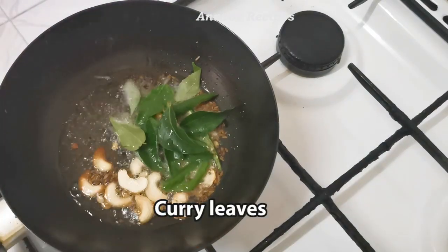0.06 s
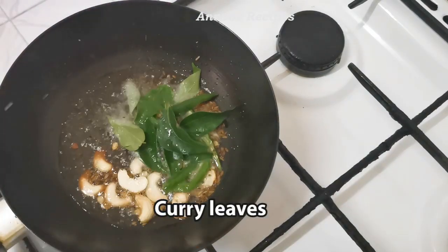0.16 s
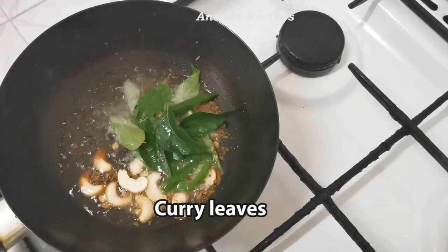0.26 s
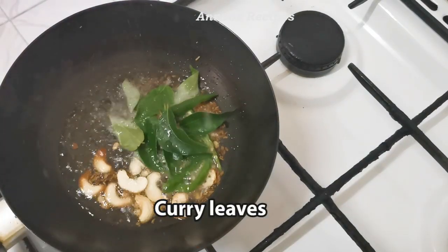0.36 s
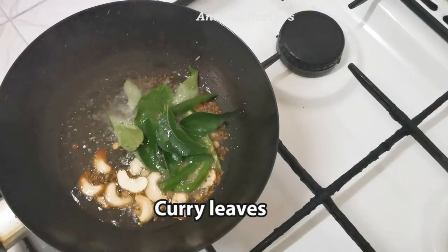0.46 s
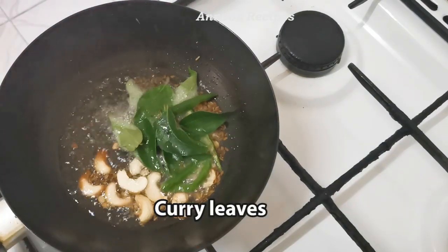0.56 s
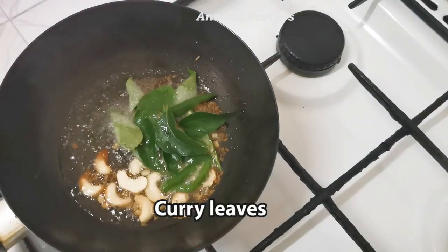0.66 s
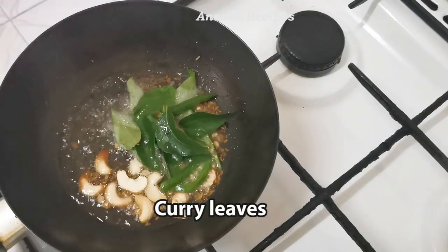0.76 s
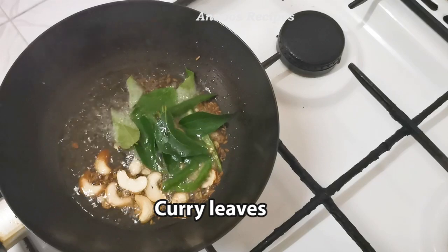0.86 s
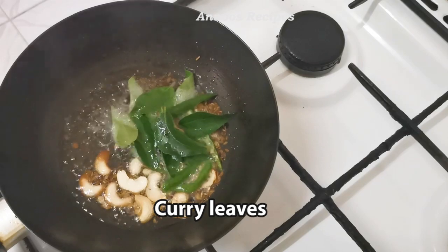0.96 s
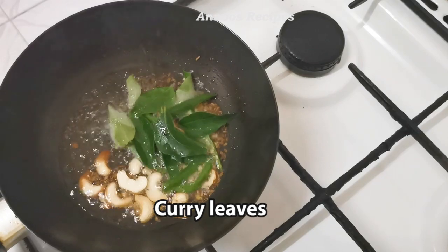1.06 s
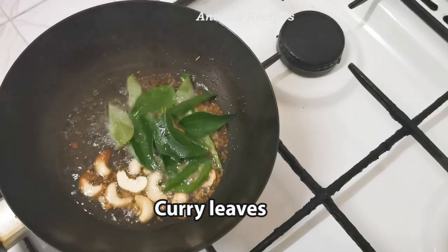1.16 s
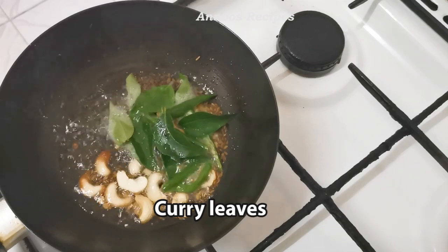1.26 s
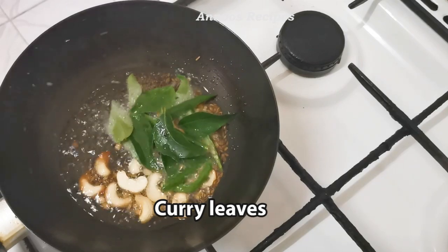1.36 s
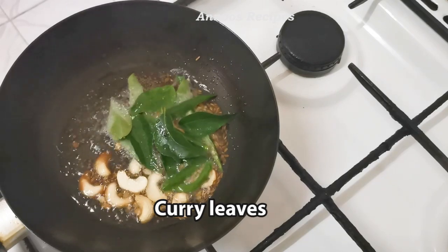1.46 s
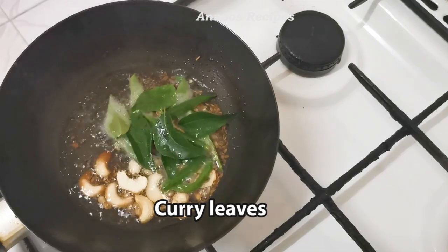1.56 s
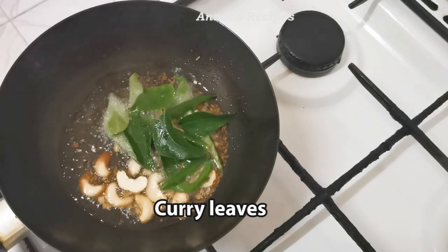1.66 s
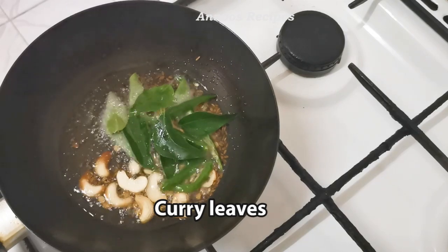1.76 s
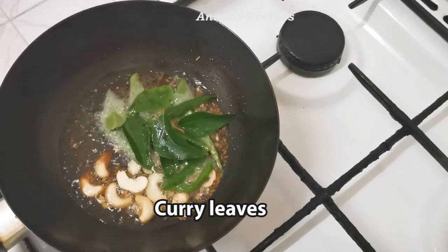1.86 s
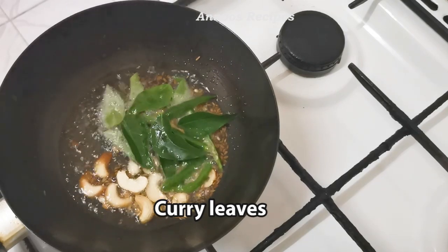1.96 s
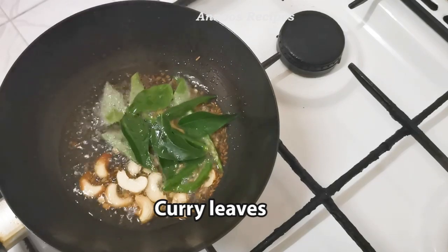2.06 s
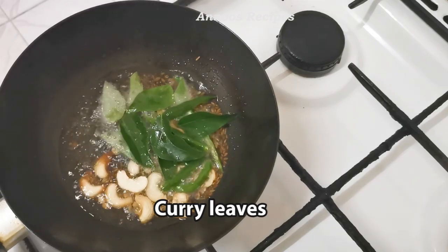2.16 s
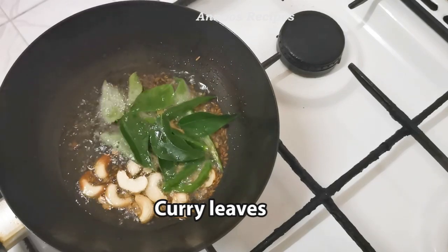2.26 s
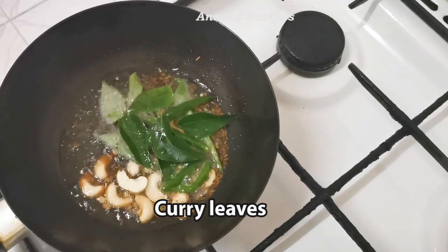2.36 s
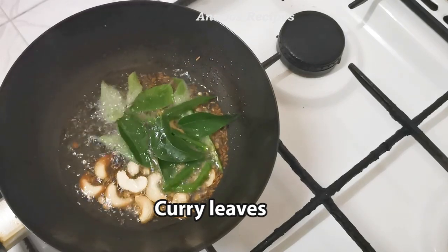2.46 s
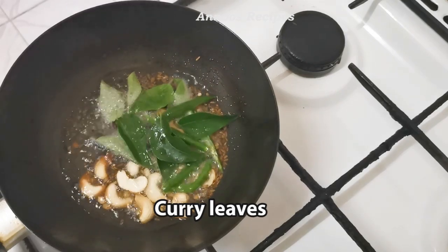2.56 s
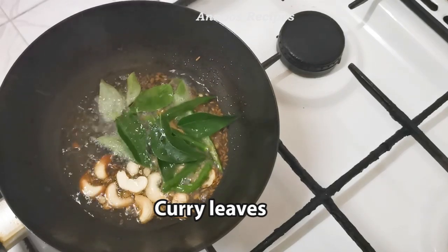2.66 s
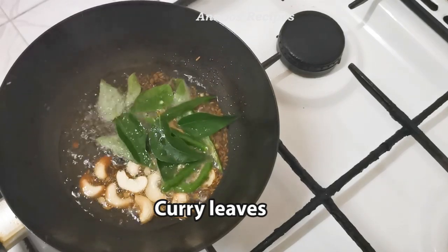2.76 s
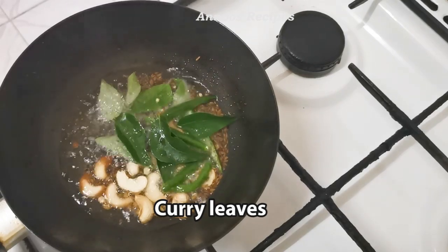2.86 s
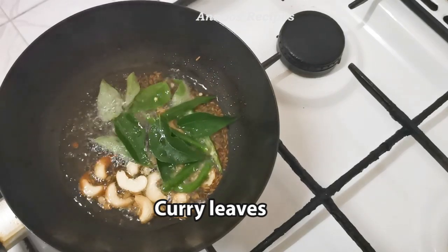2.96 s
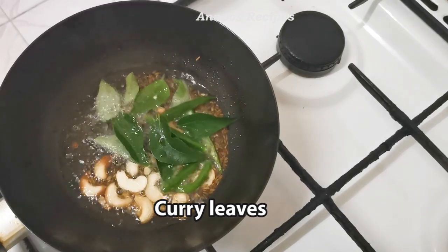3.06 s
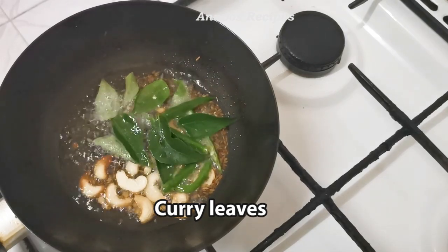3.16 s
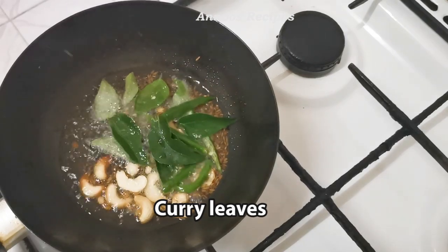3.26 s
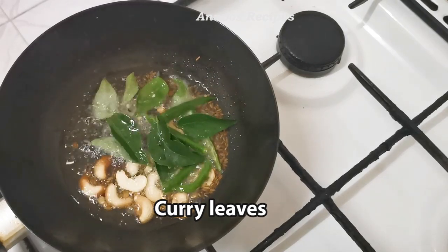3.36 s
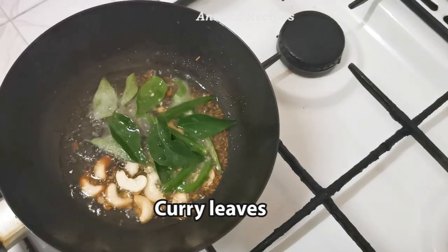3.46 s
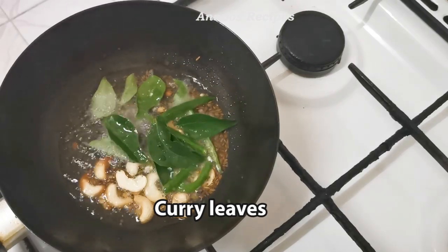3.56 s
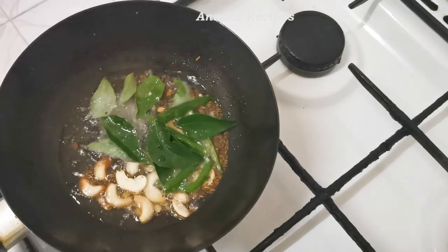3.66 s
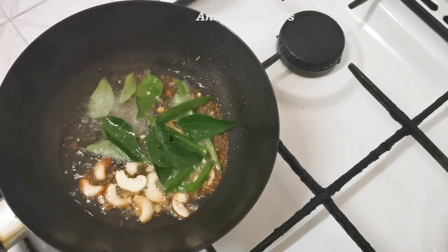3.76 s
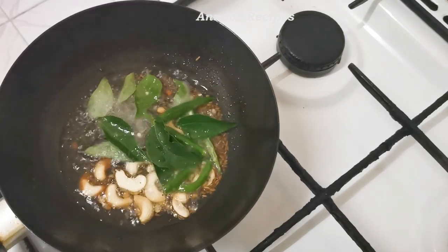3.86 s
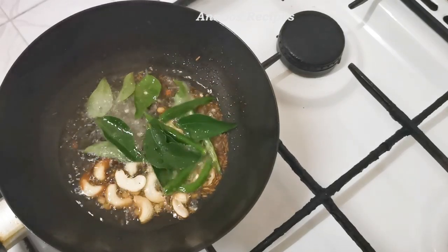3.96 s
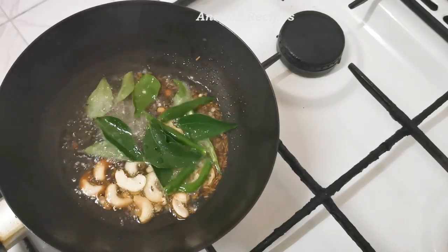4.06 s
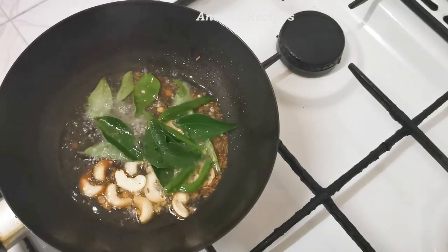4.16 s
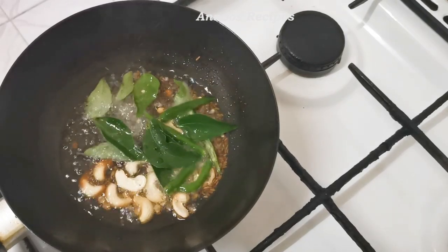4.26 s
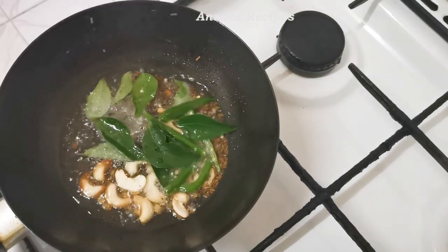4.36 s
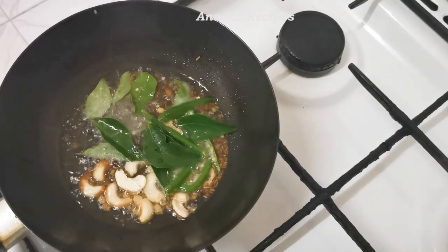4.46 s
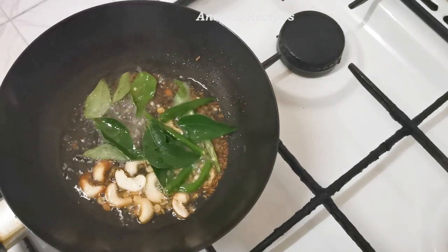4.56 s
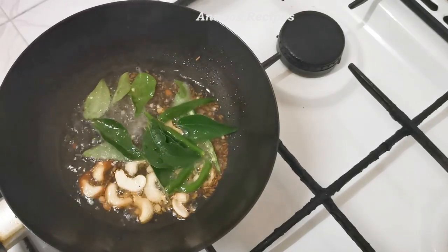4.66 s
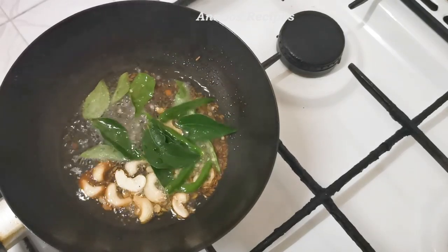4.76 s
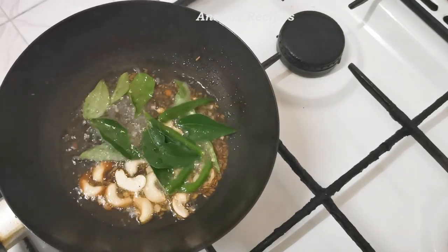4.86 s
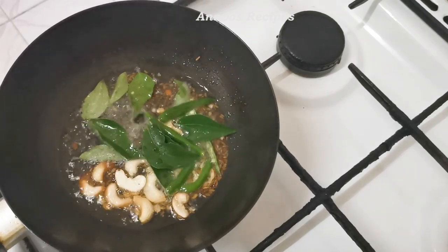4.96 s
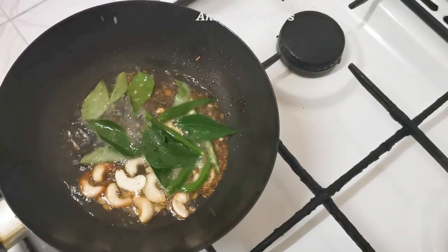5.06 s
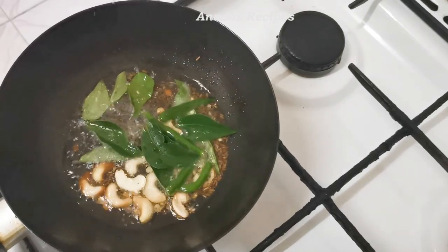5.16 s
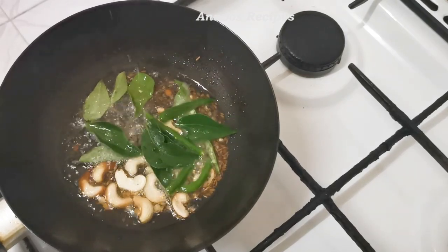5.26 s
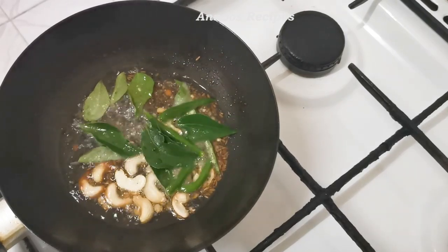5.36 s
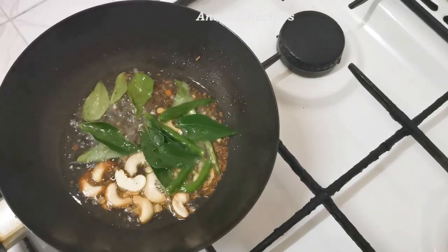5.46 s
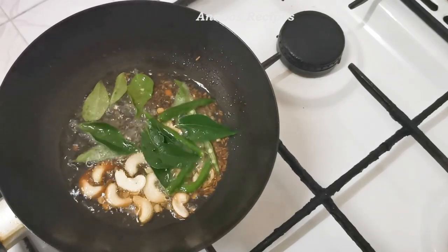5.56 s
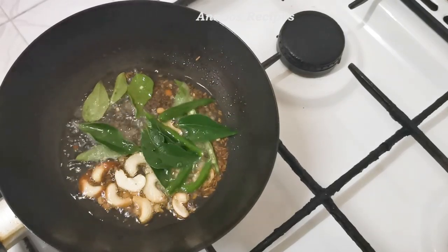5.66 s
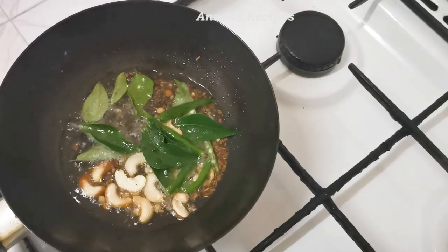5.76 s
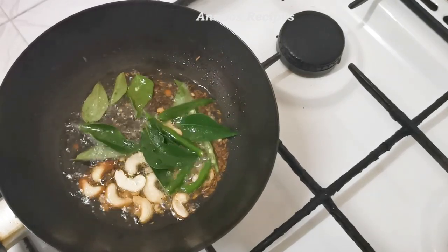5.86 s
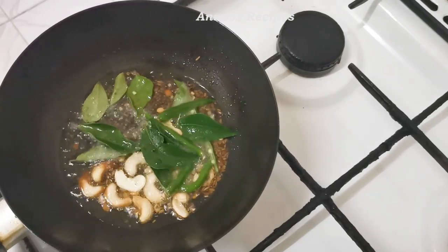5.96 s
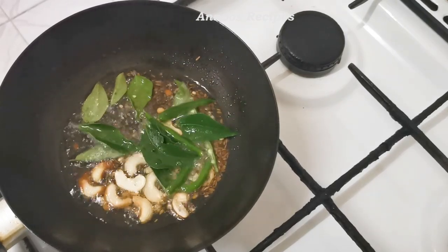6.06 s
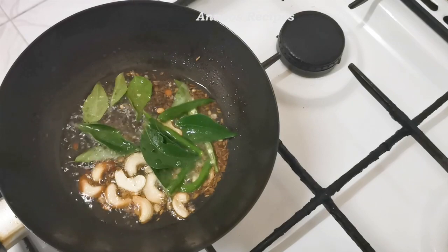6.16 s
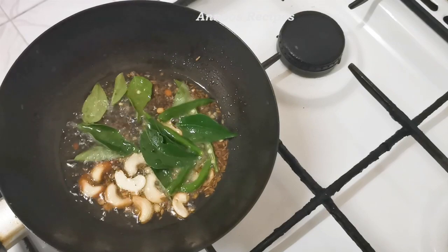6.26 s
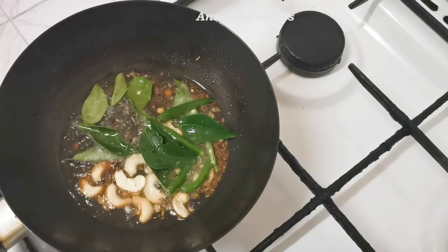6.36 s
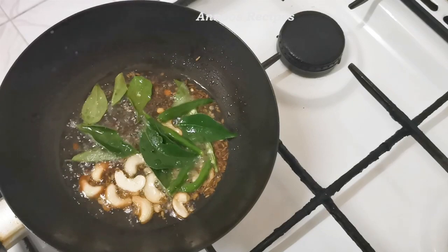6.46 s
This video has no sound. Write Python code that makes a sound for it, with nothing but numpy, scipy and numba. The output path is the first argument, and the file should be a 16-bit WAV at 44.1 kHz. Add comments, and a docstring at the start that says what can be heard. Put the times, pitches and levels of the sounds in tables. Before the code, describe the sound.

Wet leaves and cashew nuts fry in hot oil in a small wok on a kitchen stove, picked up very close in stereo. From 0 s there is a dense rush of steam hiss, slightly fuller on the left, with quick crackles; it falls off within about a second into fine, bright sizzling made of countless tiny bubbles. Irregular sharp snaps and short hollow pops run throughout. Around 2.2 s a loud crack comes with a droplet thumping the microphones, mostly right; another hard snap follows at 2.9 s. Sizzling surges briefly near 3.2 s with more cracks. At 4.1 s a droplet bumps the left side, and at about 4.5 s a strong hollow pop knocks out. After 4.6 s the frying grows thinner and quieter, yet pops and snaps continue to 6.5 s, with crisp ones near 6.1 s. A very faint wavering hum and low burner rumble lie beneath.

```python
"""Wet leaves and nuts fry in hot oil in a small wok, close under a phone with two unlike microphones.
At once a rush of steam hiss dies away over thousands of bursting bubbles a second, rung as fading sines.
A faint low tone swells and fades over the kitchen's filtered-noise rumble. Soon hollow pops and sharp
cracks ring out, then droplets push the microphones; gain control dips after loud peaks. Over the
seconds the hiss thins slowly, and the lower bubble crowd leans to its smaller, higher bubbles."""
import sys
import numpy as np
from scipy import signal
from scipy.fft import rfft, irfft
from scipy.io import wavfile
from scipy.ndimage import uniform_filter1d
from numba import njit

SR = 44100
rng = np.random.default_rng(int(sys.argv[2]) if len(sys.argv) > 2 else 0)


def persist_wave(psi):
    """Save psi, clipped to +-1, as 16-bit WAV."""
    counts = np.round(np.clip(psi, -1, 1) * 32767).astype(np.int16)
    wavfile.write(sys.argv[1], SR, np.atleast_2d(counts).T)


def volts(x):
    """Linear amplitude factor 10**(x/20) for a level x in dB, scalar or array-like."""
    e = np.asarray(x, float) / 20
    return 10 ** e


N = 288017
TIME = np.arange(N) / SR

# bubble crowds before the path to the microphones, relative levels:
# t/s, large level/dB, middling level/dB, small level/dB, extra left level/dB
BOIL_LEVELS = [(0.0, -37, -35.5, -37, 3.5), (0.3, -41, -38, -38, 4), (0.58, -43, -39.5, -40, 2.5),
               (0.82, -43, -40, -42, -0.5), (1.16, -39.5, -42.5, -39, 0.5), (1.45, -42.5, -38, -41, -0.5),
               (1.84, -39, -38.5, -40, -0.5), (2.2, -44, -42.5, -43.5, -0.5), (2.69, -41, -40, -41.5, 0),
               (2.89, -39.5, -43, -40, 0), (2.92, -45.5, -40, -45, 0), (3.16, -37.5, -36, -40.5, 0.7),
               (3.21, -43.5, -39, -43, 1), (3.32, -42, -39.5, -41, 0.3), (3.68, -40.5, -39, -38.5, 1.5),
               (3.71, -46.5, -40, -45.5, 0.5), (3.8, -44, -36, -41.5, 0), (4.31, -47, -43, -42, -0.5),
               (4.48, -46, -39.5, -44, 0.5), (4.6, -47.5, -48, -46, -1.5), (4.89, -45, -45, -41, -0.5),
               (5.28, -49.5, -49, -45.5, -1.5), (5.33, -49.5, -51, -46, -1), (5.62, -45.5, -46, -44.5, -1),
               (5.89, -49, -46, -45.5, -1.5), (6.53, -44.5, -45, -47, -0.8)]
# low hum: t/s, rms level/dB
HUM_LEVELS = [(0.15, -77), (0.33, -62.5), (0.5, -74), (0.8, -103), (1.2, -84), (1.5, -79), (1.65, -68.5),
              (1.88, -75), (2, -64), (2.15, -71.5), (2.95, -89), (3.12, -62.5), (3.22, -77), (3.5, -78),
              (3.62, -63), (4.0, -72), (4.6, -91), (5.2, -80), (5.32, -71), (5.72, -69.5), (5.82, -100),
              (6.42, -79), (6.52, -59)]
# relative spectral density of the kitchen rumble: f/Hz, level/dB
KITCHEN_SPECTRUM = [(12, -34), (20, -5), (54, -0.5), (93, -3.5), (134, 0.5), (380, -10), (603, -11),
                    (700, -5.5), (910, -56), (1540, -120)]
# hollow pops of the largest bubbles, nominal peaks:
# t/s, ring f/Hz, fade to 1/e in cycles, peak level/dB, extra left level/dB
POP_RINGS = [(0.0607, 1760, 0.15, -22.5, 3.5), (0.1101, 3110, 0.24, -29, 2),
             (0.1775, 1390, 0.26, -24.5, -1), (0.1825, 2010, 0.23, -28, 3), (0.2552, 1540, 0.44, -24, 1),
             (0.353, 1250, 0.27, -23, 1), (0.4324, 1410, 0.18, -21, 1.5), (0.4511, 2350, 2.6, -27.5, 3),
             (0.481, 2810, 1.7, -25.5, 2), (0.5136, 1910, 0.16, -23.5, 4), (0.6096, 1720, 0.43, -28, 0),
             (0.9562, 2400, 1.2, -25, 4.5), (1.0621, 3350, 2.6, -27, 3), (1.3334, 2660, 1.9, -25.5, 3),
             (1.4704, 3460, 1.2, -20.5, -2), (1.5891, 2400, 0.91, -30, -3), (1.6786, 2900, 0.36, -21.5, 2),
             (1.7996, 2900, 0.38, -24, 1), (1.8051, 3100, 2.76, -25, 3), (1.8892, 2390, 1.6, -26, 1.5),
             (1.9745, 2500, 0.22, -25, 1), (2.1601, 2080, 0.19, -25, 0), (2.2937, 2350, 0.11, -21.5, 0),
             (2.3824, 1580, 0.86, -21.5, -0.5), (2.4715, 1920, 0.21, -28.5, 2),
             (2.4777, 1770, 0.17, -29, 1), (2.5004, 1350, 0.31, -23.5, -1), (2.593, 2330, 3, -21.5, -1),
             (2.6412, 2760, 2.21, -35, -1), (2.769, 1850, 0.25, -24, 1), (2.8473, 2060, 0.61, -23, -1),
             (2.8758, 1270, 0.5, -26.5, 1), (3.0118, 2520, 0.51, -29, 0), (3.1376, 2020, 0.83, -20, 1),
             (3.1843, 2070, 0.2, -26, 4), (3.285, 1490, 0.51, -21.5, -0.5), (3.2938, 1860, 0.18, -28, 0),
             (3.3213, 1420, 0.33, -25.5, 0), (3.5659, 1710, 0.7, -26.0, 0), (3.6552, 1830, 0.95, -24.5, 1),
             (3.7483, 2600, 1.1, -28, -2), (3.9412, 1390, 0.26, -22, -0.5), (4.0738, 2890, 0.69, -25, 0),
             (4.0834, 2500, 1.9, -27.5, 3.5), (4.1255, 1920, 0.97, -20.5, 0.5),
             (4.2249, 2570, 4.5, -30.5, 0), (4.2639, 2160, 3.3, -28, -2), (4.3804, 2780, 0.63, -28, -1),
             (4.479, 2350, 0.21, -22, -4), (4.4848, 1510, 0.17, -13.5, -0.5), (4.5466, 3290, 1.9, -31, 0),
             (4.5905, 2920, 0.29, -25, 2), (4.7051, 2030, 3.0, -29, -2), (4.7098, 2880, 1.5, -32, 0),
             (4.776, 1420, 0.56, -24.5, -1), (4.8066, 1470, 0.44, -25.5, 0), (4.8295, 1410, 0.25, -19.5, 1),
             (5.0492, 2860, 1.3, -33, 0), (5.0831, 2270, 0.98, -26, -2), (5.1758, 2760, 1.2, -34, -1),
             (5.2006, 2010, 0.18, -32, 1), (5.2155, 3400, 1.5, -28.0, -1), (5.281, 2530, 1.9, -24, 0),
             (5.5055, 2580, 2.2, -22, 0), (5.5969, 1780, 0.16, -34, 1), (5.6103, 1940, 0.37, -26, 1),
             (5.7383, 2980, 0.29, -25.5, 0), (5.9002, 2200, 0.21, -28.5, -2), (5.909, 2290, 0.25, -28.5, 0),
             (5.9651, 1490, 0.29, -32, -2), (5.9704, 1950, 0.58, -26.5, 0), (6.0714, 2760, 0.13, -27, 3),
             (6.1765, 2790, 0.25, -27, 2), (6.2469, 2250, 0.31, -24.5, 0), (6.2521, 1890, 0.88, -28, 0),
             (6.4956, 1960, 0.96, -24.5, -1.5)]
# sharp cracks as a film of oil tears, nominal peaks:
# t/s, ring f/Hz, fade to 1/e in cycles, peak level/dB, extra left level/dB
CRACK_RINGS = [(0.0608, 6180, 0.65, -22, 8), (0.1105, 6910, 0.35, -20, -5), (0.1826, 7100, 0.77, -17.5, 3),
               (0.2345, 6980, 1.15, -17.5, 6), (0.2941, 7700, 0.66, -18.5, 4), (0.4688, 7250, 1.41, -17, 3),
               (0.4786, 7290, 0.66, -22, -1), (0.4925, 6770, 1.57, -19.5, 5), (0.5137, 6440, 1.98, -29, 3),
               (0.5279, 8600, 0.66, -18, 7), (0.5717, 5730, 0.4, -17, 3), (0.7291, 6990, 0.66, -19, 5),
               (0.8278, 8970, 0.53, -23.5, 1), (0.8364, 7300, 0.7, -22, 3), (1.1448, 5100, 3.7, -22.5, 3),
               (1.17, 7360, 1.8, -28, -4), (1.1742, 6610, 0.72, -18, 2), (1.1928, 9090, 2.4, -26, -3),
               (1.277, 9040, 1.11, -22, 7), (1.3085, 8400, 1.1, -19, 0), (1.3736, 7100, 1.1, -24, -2),
               (1.4101, 7720, 0.79, -18, -31), (1.5224, 6000, 0.43, -16.5, -3),
               (1.5608, 8670, 1.42, -33, -9), (1.5672, 5800, 1.1, -14.5, -2), (1.7452, 7400, 2.4, -20, -7),
               (1.9782, 6950, 1.0, -21, -3), (2.0394, 7750, 1.25, -21, -9), (2.0623, 7660, 1, -19, -4),
               (2.1658, 7280, 0.72, -19, -10), (2.1767, 8000, 0.87, -11, 3), (2.2932, 8060, 0.3, -19, -1),
               (2.3793, 5870, 1.9, -24, -2), (2.4716, 7510, 2.56, -20, -2), (2.4779, 8100, 0.8, -25, -23),
               (2.5005, 7180, 0.34, -16.5, -6), (2.6055, 8340, 0.82, -25, -5), (2.7818, 5900, 2.2, -23, -2),
               (2.8483, 6200, 1.5, -24, -2), (2.8913, 7130, 1.06, -21, -5), (2.9044, 7900, 0.57, -13.5, -3),
               (3.0483, 8140, 1, -20, -11), (3.1464, 6960, 2.64, -26, -7), (3.1771, 6770, 0.7, -23, 2),
               (3.1845, 7900, 0.5, -13.5, -1), (3.294, 8730, 0.65, -18.5, 1),
               (3.3466, 5240, 0.71, -17.5, 1), (3.4334, 7100, 1.1, -22, -2), (3.512, 6440, 2.1, -22, 2),
               (3.5941, 6900, 1.1, -28, -2), (3.61, 6140, 3.1, -20, 4), (3.6869, 7790, 1.35, -21, 3),
               (3.8502, 6730, 1.53, -29, 2), (3.8651, 7500, 1.2, -20, -1), (3.9413, 5900, 0.8, -29, 0),
               (3.9472, 6100, 0.97, -18.5, -1), (4.085, 6900, 1.1, -23, -2), (4.0896, 6790, 0.51, -22, -3),
               (4.0999, 6670, 0.29, -18, 8.5), (4.2214, 6200, 0.78, -29, -3),
               (4.2308, 8200, 1.3, -19.5, -10), (4.3588, 6900, 1.1, -21.5, -2),
               (4.4669, 7300, 3.0, -28.0, -3), (4.4849, 4560, 2.1, -23.5, -3), (4.547, 6400, 0.6, -28, 0),
               (4.5906, 9050, 2, -19, -4), (4.754, 6680, 0.57, -24, 6), (4.7761, 6800, 0.7, -23, 0),
               (4.8067, 7770, 1.04, -25, -2), (4.8298, 10140, 1.2, -23.5, -5),
               (4.9724, 7140, 0.85, -20, -5), (5.0351, 7300, 0.9, -26, -6), (5.059, 7600, 1.1, -24, -6),
               (5.088, 7900, 1.1, -25, -5), (5.1272, 6900, 1.1, -28, -2), (5.154, 7100, 0.9, -26, -3),
               (5.2008, 9250, 3.0, -24, -1), (5.2157, 8550, 0.26, -23.5, 1), (5.2326, 7760, 2.68, -31, -8),
               (5.3054, 6180, 0.55, -19.5, 4), (5.3621, 6900, 0.9, -27, -2), (5.3913, 6800, 1.2, -26, -4),
               (5.4583, 8560, 1.3, -22.5, -3), (5.5245, 7340, 0.9, -26.5, -2), (5.6174, 9030, 3.0, -30, 0),
               (5.64, 8460, 0.51, -25, -7), (5.6529, 6830, 0.7, -30, -4), (5.7636, 8240, 0.86, -22.5, -9),
               (5.8042, 8840, 0.77, -27, -6), (5.8331, 7540, 2.2, -23.5, -11), (5.8956, 8200, 0.71, -21, 4),
               (6.0487, 7780, 2.7, -28, -9), (6.0716, 6600, 0.83, -16.5, -2), (6.1179, 7600, 0.58, -27, -7),
               (6.1767, 7850, 1, -16.5, -8), (6.2995, 7250, 2.8, -26.5, -9), (6.3163, 6810, 0.71, -26, -1),
               (6.335, 9350, 0.78, -22.5, -6), (6.3834, 6960, 1.1, -27, -2), (6.495, 6900, 0.63, -23, -3)]
# droplets on the microphones: t/s, left push level/dB, right push level/dB
DROPLET_PUSHES = [(0.34, -40, -60), (0.375, -38, -48), (0.527, -70, -38), (0.627, -42, -45),
                  (1.411, -70, -44), (2.063, -68, -43), (2.177, -29.5, -14), (2.9048, -63.5, -31.5),
                  (4.0998, -24.5, -51), (4.515, -33, -46), (4.5909, -52, -35), (6.177, -69.5, -37.5)]
# response of wok bowl and microphone ports together: f/Hz, left level/dB, right level/dB
PORT_RESPONSE = [(262, -24.5, -20), (540, -13, -17.5), (629, -20, -26), (659, -9, -13), (713, -17, -15),
                 (840, -6.5, -7), (984, -5, -3), (1330, -8, -10), (1590, -1, -2), (1770, -3, -1),
                 (1950, 1, 1), (2363, -7, -3), (2600, -0.5, 1), (2900, 0, 4.5), (3100, 0, 0.5),
                 (3080, 0, 1), (4300, -12, -2.5), (5450, -4.5, 3), (5800, 0, 5.5), (6070, -14, 2.5),
                 (6290, -9, 2), (7745, -14.5, 9), (8180, -20, 0.5), (10090, -24.5, -14),
                 (13000, -19, -19.5), (15050, -17, -15), (15600, -41, -42), (16800, -44, -66.5)]

BUBBLES_A_SECOND = 2600  # in each of the four crowds
HUM_HZ, HUM_WOBBLE = 141.5, 0.0174  # mean pitch; rms wobble as a fraction of it, nearly
KITCHEN_DB = -70  # mean level, about which it flutters
# lesser bursts at random: mean peak over the boil, half-range about it, reference fade
SPITS_A_SECOND = 20
SPIT_OVER_DB, SPIT_SPREAD_DB, SPIT_CYCLES = 7.5, 7.5, 0.73
EDGE_HZ, EDGE_CYCLES, EDGE_DB = 9800, 0.18, -17.5  # click at the start of a crack, dB re the crack's peak
# trail as a cavity closes: base level, slope with delay, longest added delay, pitch scatter either way
SPLUTTER_DB, SPLUTTER_DB_PER_MS, SPLUTTER_S, SPLUTTER_OCTAVES = -10, -1.15, 0.007, 0.51
GAIN_OVER_DB, GAIN_RATIO, GAIN_RELEASE_S = -27, 1.092, 0.14  # threshold, compression, e-fold of the follower


def curve(table):
    """Linear interpolation of a table's columns over time."""
    s, *columns = np.transpose(table)
    return [np.interp(TIME, s, c) for c in columns]


def over_hz(table, size):
    """Interpolation over log frequency onto the bins of a transform of this size."""
    hz, *columns = np.transpose(table)
    log_bins = np.log(np.fft.rfftfreq(size, 1 / SR) + 1)
    return np.array([np.interp(log_bins, np.log(hz), c) for c in columns])


def causal(db):
    """Minimum phase by the folded cepstrum: the response starts at once and rings after."""
    cepstrum = irfft(np.log(volts(db)))
    half = cepstrum.shape[-1] // 2
    cepstrum[..., 1:half] *= 2
    cepstrum[..., half + 1:] = 0
    return np.exp(rfft(cepstrum))


def band(x, lo_hz, hi_hz):
    """Butterworth band-pass filtering."""
    sections = signal.butter(2, [lo_hz, hi_hz], "bandpass", fs=SR, output="sos")
    return signal.sosfilt(sections, x)


def unit(x):
    """Normalisation to rms 1 in the mean of both channels."""
    return x / np.sqrt(np.mean(np.mean(x, axis=0) ** 2))


def walk(rate):
    """Slow random modulation: levels drawn at this rate in Hz, joined by ramps, with a spread near 1."""
    hold = int(SR / rate)
    levels = np.repeat(rng.standard_normal(N // hold + 1), hold)
    return 1.15 * uniform_filter1d(levels, hold)[:N]


@njit
def ring(start, hz, cycles, size, length):
    """Damped oscillation: each burst is a fading sine, its start in samples and size given per microphone."""
    out = np.zeros((2, length + 4096))
    for k in range(len(hz)):
        pole = np.exp((2j * np.pi - 1 / cycles[k]) * hz[k] / SR)
        for c in range(2):
            first = int(start[k, c])
            z = size[k, c] * pole ** (first + 1 - start[k, c])  # keeps the fraction of a sample
            for i in range(min(int(6 * cycles[k] * SR / hz[k]), 4000)):
                out[c, first + 1 + i] += z.imag
                z *= pole
    return out[:, :length]


def bubbles(lo_hz, hi_hz, cycles, spread_db, most_db, lag_s, pan_db, surge_db, shrink_db=0):
    """Superposition of random bursts: most small, some larger, each from its own spot, in surges."""
    count = int(BUBBLES_A_SECOND * N / SR)
    when, pitch, rarity = rng.random((count, 3)).T
    lag, fade, pan = rng.standard_normal((count, 3)).T
    hz = lo_hz * (hi_hz / lo_hz) ** pitch
    at = when * (N - 64) + 32
    # exponential spread in dB, bent over towards most_db
    extra_db = most_db * np.tanh(-spread_db * np.log(rarity + 1e-4) / most_db)
    # size rises with pitch so that the crowd is even over frequency
    size = hz * volts(extra_db + surge_db[at.astype(int)])
    # as the leaves dry the crowd leans to its smaller bubbles: dB per octave per second
    octaves = np.log2(hz / np.sqrt(lo_hz * hi_hz))
    size = size * volts(shrink_db * (at - N / 2) / SR * octaves)
    side = np.array([1, -1])
    start = at[:, None] + np.clip(lag_s * SR * lag, -30, 30)[:, None] * side / 2
    fades = cycles * volts(4.6 * fade)
    sizes = size[:, None] * volts(pan_db * pan[:, None] * side / 2)
    return unit(ring(start, hz, fades, sizes, N))


def sizzle():
    """Bubble resonance: three sizes fill three bands and surge together; film ticks lie at the top."""
    large_db, middling_db, small_db, left_db = curve(BOIL_LEVELS)
    surge = walk(50)
    large = bubbles(682, 4720, cycles=1.0, spread_db=4.5, most_db=16.0, lag_s=4e-5,
                    pan_db=-0.5, surge_db=1.5 * surge, shrink_db=.5)
    middling = bubbles(4850, 6410, cycles=1.56, spread_db=8.5, most_db=16.5, lag_s=1.5e-5,
                       pan_db=5.0, surge_db=1.6 * surge)
    small = bubbles(6550, 11650, cycles=1.67, spread_db=7.0, most_db=25.5, lag_s=1.5e-5,
                    pan_db=4.0, surge_db=0.53 * surge)
    ticks = bubbles(12200, 14400, cycles=0.17, spread_db=9.5, most_db=21.5, lag_s=1.5e-5,
                    pan_db=3.0, surge_db=1.95 * surge)
    crowd = volts(large_db) * large + volts(middling_db - 7.0) * middling
    crowd = crowd + volts(small_db) * (volts(-2.0) * small + volts(-0.9) * ticks)
    return crowd * volts([left_db, 0 * left_db])


def steam():
    """Turbulent noise: a puffing high hiss, a first rush dying away, then thinning as the leaves dry."""
    rush_db = 8.0 * np.exp(-TIME / 0.5)
    puff_db = 2.3 * walk(14)
    hiss = band(rng.standard_normal((2, N)), 8200, 17500)
    return volts(-39.0 - 1.45 * TIME + rush_db + puff_db) * hiss


def hum():
    """Frequency and amplitude modulation: one low wavering tone that swells and fades."""
    hz = HUM_HZ * (1 + HUM_WOBBLE * walk(9.2))
    phase = 2 * np.pi * np.cumsum(hz) / SR
    return np.sqrt(2) * volts(curve(HUM_LEVELS)[0]) * np.sin(phase)


def kitchen(apart=0.27):
    """Partly coherent noise: low rumble of burner and room, its mid shared and its side opposed."""
    spectrum = rfft(rng.standard_normal((2, N))) * volts(over_hz(KITCHEN_SPECTRUM, size=N))
    mid, side = irfft(spectrum, N)
    flutter_db = 2.8 * walk(9)
    return volts(KITCHEN_DB + flutter_db) * unit(mid + apart * side * np.array([[1], [-1]]))


def burst(rows, lo_hz, hi_hz):
    """Damped resonance within a band, sized by its peak after the mean bowl and port response."""
    s, hz, cycles, peak_db, left_db = rows.T
    count = len(hz)
    cycles = np.clip(cycles, .1, 5)
    lag = 1.5e-5 * SR * rng.standard_normal((count, 1)) * np.array([1, -1])
    start = s[:, None] * SR + lag
    # ring every burst in a slot of its own to find the peak it would reach at size 1
    slots = np.arange(count)[:, None] * 512. + np.zeros(2)
    alone = ring(slots, hz, cycles, np.ones((count, 2)), count * 512)
    alone = band(alone[0].reshape(-1, 512), lo_hz, hi_hz)
    response = causal(over_hz(PORT_RESPONSE, size=512)).mean(axis=0)
    peak = np.abs(irfft(rfft(alone) * response)).max(axis=1)
    size = volts(np.transpose([peak_db + left_db, peak_db])) / peak[:, None]
    return band(ring(start, hz, cycles, size, N), lo_hz, hi_hz)


def spits(lo_hz, hi_hz, boil_db):
    """Random arrivals: lesser bursts in rows like the loud ones, scaled to the boil."""
    count = int(SPITS_A_SECOND * N / SR)
    at, pitch, fade, share, spot = rng.random((count, 5)).T
    s = (at * (N - 64) + 32) / SR
    hz = lo_hz * (hi_hz / lo_hz) ** pitch
    cycles = SPIT_CYCLES * volts(10 * (2 * fade - 1.5))
    peak_db = boil_db[(at * (N - 1)).astype(int)] + SPIT_OVER_DB + SPIT_SPREAD_DB * (2 * share - 1)
    left_db = 1.6 * (2 * spot - 1)
    return np.transpose([s, hz, cycles, peak_db, left_db])


def splutter(rows, under_db=0, count=5):
    """Cavity collapse: each burst trails later, weaker ones at scattered pitches."""
    late, pitch, share = rng.random((len(rows), count, 3)).T
    late_s = .0008 + SPLUTTER_S * late ** 2
    trail = np.repeat(rows[None], count, axis=0)
    shift_hz = trail[..., 1] * (2 ** (SPLUTTER_OCTAVES * (2 * pitch - 1)) - 1)
    drop_db = SPLUTTER_DB + under_db + SPLUTTER_DB_PER_MS * 1000 * late_s - 6 * share
    trail = trail + np.stack([late_s, shift_hz, 0 * late, drop_db, 0 * late], axis=-1)
    return np.vstack([rows, trail.reshape(-1, rows.shape[1])])


def pops():
    """Cavity resonance gives hollow rings; above them lie sharp cracks, each with a click at its start."""
    large_db, _, small_db, _ = curve(BOIL_LEVELS)
    hollow_rows = np.vstack([POP_RINGS, spits(1000, 4500, large_db)])
    crack_rows = np.vstack([CRACK_RINGS, spits(3700, 10600, small_db)])
    # a click keeps its crack's time and side, with pitch and fade of its own
    edge_rows = crack_rows * [1, 0, 0, 1, 1] + [0, EDGE_HZ, EDGE_CYCLES, EDGE_DB, 0]
    hollow = burst(splutter(hollow_rows), 190, 10400)
    cracks = burst(splutter(crack_rows, under_db=-6), 3740, 16800)
    return hollow + cracks + burst(edge_rows, 9200, 15300)


def leak(x, seconds):
    """Exponential relaxation: each input decays to 1/e in this time."""
    return signal.lfilter([1], [1, -np.exp(-1 / (seconds * SR))], x)


def droplets(bulge_db=-6.0, bulge_s=0.00051, leak_s=0.0028, recover_s=0.04):
    """Membrane displacement: a splash flicks it out, then in as pressure leaks; the coupling swings back."""
    s, *db = np.transpose(DROPLET_PUSHES)
    hit = np.zeros((2, N))
    hit[:, (s * SR).astype(int)] = volts(np.array(db))
    before = np.arange(64)[::-1] / SR
    bulge = volts(bulge_db) * np.exp(-(before / bulge_s) ** 4)
    # the outward flick rises just ahead of the inward push
    flick = signal.fftconvolve(hit, bulge[None], axes=1)[:, 64:N + 64]
    push = np.pad(flick, ((0, 0), (0, 1))) - leak(hit, leak_s)
    push = uniform_filter1d(push, size=7)
    return leak(np.diff(push, prepend=0), recover_s)


def heard(x, tail_db=-6.0, tail_t60=0.034, far_db=-20, far_t60=0.76, apart=1.0):
    """Filtering and reverberation: bowl and ports colour; stove top and walls smear, partly unlike per side."""
    t = TIME[:8192]
    near = volts(tail_db - 60 * t / tail_t60) / np.sqrt(tail_t60 * SR / 14)
    far = volts(far_db - 60 * t / far_t60) / np.sqrt(far_t60 * SR / 14)
    shared, *own = rng.standard_normal((3, len(t)))
    echo = (shared + apart * np.array(own)) * (near + far) * (t > .0007)
    echo[:, 0] = 1  # direct sound
    # bursts come from many spots, so the echoes spread them in time without a colour of their own
    echo = rfft(echo, 2 * len(t))
    echo_db = 10 * np.log10(uniform_filter1d(np.abs(echo) ** 2, size=12))
    path = irfft(echo * causal(over_hz(PORT_RESPONSE, size=2 * len(t)) - echo_db))
    return signal.fftconvolve(x, path[:, :len(t)], axes=1)[:, :N]


@njit
def follow(peak, release):
    """Peak detection: jumps up with each peak, sinks slowly after it."""
    out, level = np.empty(len(peak)), 0.
    for i in range(len(peak)):
        level = max(peak[i], level * release)
        out[i] = level
    return out


def scene():
    """Linear superposition of all sources at the two microphones."""
    frying = heard(sizzle() + steam() + pops())
    return frying + hum() + kitchen() + droplets()


def roll_off(x):
    """The treble ends steeply here."""
    return signal.sosfilt(signal.butter(12, 16470, fs=SR, output="sos"), x)


def record(dry):
    """Dynamic compression: peaks over the threshold lower the gain of both sides, which then creeps back."""
    peak = follow(np.abs(dry).max(axis=0), np.exp(-1 / (GAIN_RELEASE_S * SR)))
    gain = np.minimum(1, volts(GAIN_OVER_DB) / (peak + 1e-9)) ** (1 - 1 / max(GAIN_RATIO, 1))
    # mean over the last 5 ms, so the gain falls just after a peak
    gain = uniform_filter1d(gain, size=221, origin=110, mode="nearest")
    return roll_off(dry * gain)


dry = scene()
out = record(dry)
persist_wave(out)
```